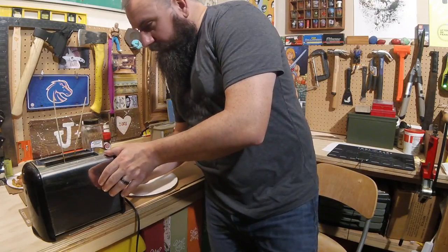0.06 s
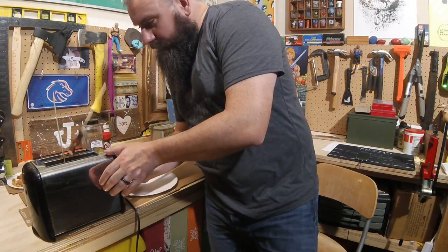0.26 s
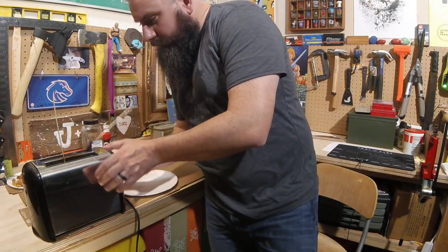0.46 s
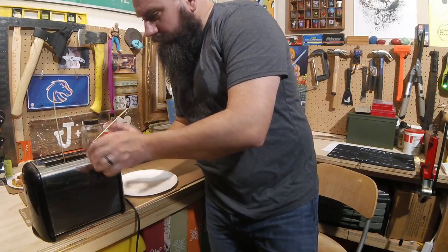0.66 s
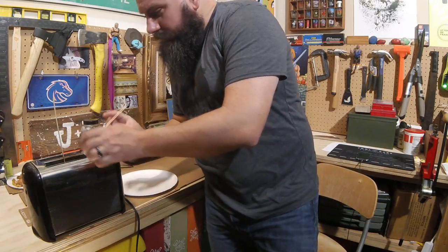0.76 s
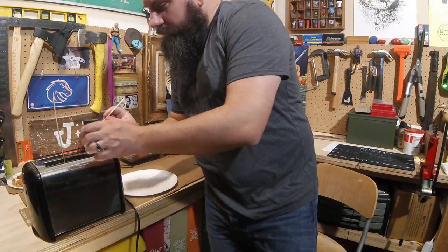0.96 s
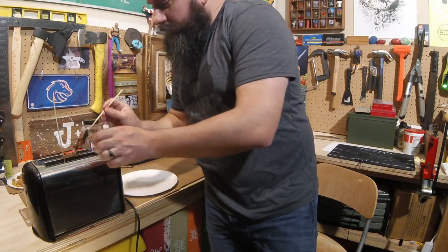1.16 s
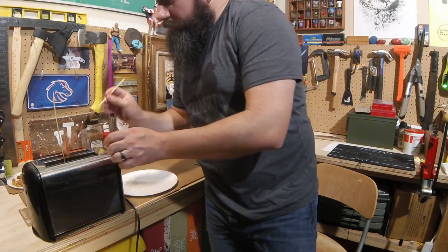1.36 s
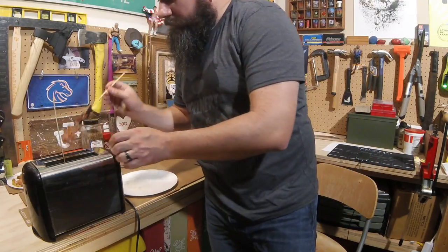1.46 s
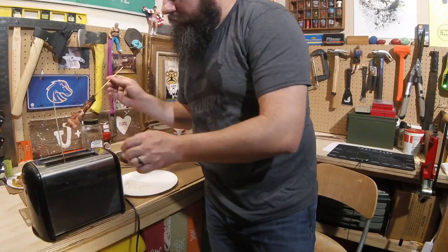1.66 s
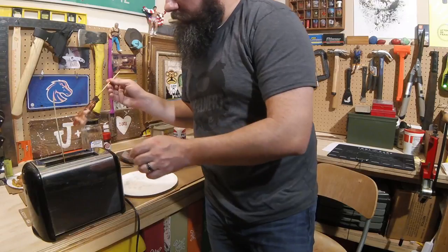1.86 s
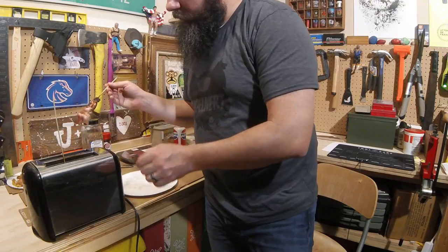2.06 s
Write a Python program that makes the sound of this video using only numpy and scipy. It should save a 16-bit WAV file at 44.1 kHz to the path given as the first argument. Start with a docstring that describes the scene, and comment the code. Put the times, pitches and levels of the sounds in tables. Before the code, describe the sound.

A toaster carriage pops up with a short scrape, a loud metallic clunk and brief rattle

```python
"""Pop-up toaster on a workshop bench

The carriage scrapes up its guide as dense tiny slips, slams into its stop and sets the steel shell ringing
(noise bursts and damped modes), then rebounds and rattles to rest. Later come a faint tink and one sharp,
bright click as a stick lifts something out of the slot. A small room answers with a decaying noise tail,
over a low wavering hum and hiss."""
import sys
import numpy as np
from scipy import signal
from scipy.fft import rfft, irfft, next_fast_len
from scipy.io import wavfile
from scipy.ndimage import map_coordinates

SR = 44100
rng = np.random.default_rng(int(sys.argv[2]) if len(sys.argv) > 2 else 0)


def unload_audio(sound):
    """Save the sound as a 16-bit wav file, at the path given as the first command line argument."""
    columns = np.transpose(np.atleast_2d(sound))
    # keep every value between -1 and 1, then stretch to whole-number steps
    steps = np.round(np.clip(columns, -1, 1) * 32767)
    wavfile.write(sys.argv[1], SR, steps.astype(np.int16))


N = 92610  # 2.1 s

# colour of light metal contacts, for the rack, the tinks and the clicks: f/Hz, relative level/dB
RATTLE_COLOUR = [(300, -14), (1500, -4.5), (2000, -8), (2900, 3), (3400, -5), (4200, 0), (4900, -10),
                 (6400, -23), (7500, -35), (13000, -54)]

CLICK_ATTACK_S, CLUNK_ATTACK_S, RATTLE_RISE_S = .0005, 0.00089, .002


def amp(db):
    """Decibels to gain."""
    return 10 ** (np.asarray(db) / 20)


def unit(x):
    """Scale to rms 1."""
    return x / np.sqrt(np.mean(x ** 2) + 1e-20)


def since(s):
    """Seconds since time s, zero before it."""
    return np.maximum(np.arange(N) / SR - s, 0)


def along(points, hz):
    """Read a curve of (Hz, value) points on a log frequency axis."""
    f, v = np.transpose(points)
    return np.interp(np.log(hz + 1), np.log(f + 1), v)


def wobble(rate):
    """A smooth random curve with this many knots a second."""
    return map_coordinates(rng.standard_normal(N // 20), [since(0) * rate])


def filtered(x, response):
    """Multiply the spectrum of x by a response of frequency."""
    m = next_fast_len(N + SR // 2)
    return irfft(rfft(x, m) * response(np.fft.rfftfreq(m, 1 / SR)), m)[:N]


def coloured(x, spectrum):
    """Pass x through a causal minimum-phase filter of unit power with this spectrum."""
    m = next_fast_len(N + SR // 2, True)
    gain = unit(amp(along(spectrum, np.fft.rfftfreq(m, 1 / SR))))
    # folding the cepstrum onto positive time puts the energy as early as it can be
    cepstrum = irfft(np.log(gain), m)
    cepstrum[1:m // 2] *= 2
    cepstrum[m // 2 + 1:] = 0
    return irfft(rfft(x, m) * np.exp(rfft(cepstrum)), m)[:N]


def noise(spectrum):
    """Steady noise, white at rms 1 before it is coloured."""
    return coloured(rng.standard_normal(N), spectrum)


def resonate(x, peaks):
    """Excite parallel band-pass resonances given as (Hz, width Hz, dB)."""
    def response(f):
        return sum(amp(db) * 1j * f * width / (centre ** 2 - f ** 2 + 1j * f * width)
                   for centre, width, db in peaks)
    return filtered(x, response)


def ring(s, modes, attack_s):
    """Damped modes (Hz, dB, t60 s) struck at time s, their levels a little different at every blow."""
    spread_db = 1 * rng.standard_normal(len(modes))
    t = since(s)
    live = (t > 0) & (t < .5)
    t = t[live]
    tone = np.zeros(len(t))
    for k, (hz, db, t60) in enumerate(modes):
        decay = amp(db + spread_db[k] - 60 * t / t60)
        tone += (-1) ** k * decay * np.sin(2 * np.pi * hz * t)  # alternate polarity
    out = np.zeros(N)
    out[live] = (1 - np.exp(-t / attack_s)) * tone
    return out


def bursts(rows, spectrum, rise_s=0.00031):
    """Coloured noise that flares and dies away at each (s, dB, t60 s); overlapping bursts add in power."""
    power = np.zeros(N)
    for s, db, t60 in rows:
        t = since(s)
        decay = amp(db - 60 * np.minimum(t / t60, 2))
        power += ((1 - np.exp(-t / rise_s)) * decay) ** 2
    return coloured(np.sqrt(power) * rng.standard_normal(N), spectrum)


def slide():
    """The catch snaps free and dense tiny slips scrape along the guide, exciting its resonances."""
    # swell of the scrape as the carriage rises: t/s, level/dB
    swell = [(.150, -76.5), (.163, -61), (.171, -44), (.182, -34), (.213, -39.5), (.228, -31.5),
             (.243, -34.5), (.255, -39.5), (.299, -38.5), (.302, -70)]
    # colour of the scrape: f/Hz, relative level/dB
    scrape_colour = [(70, -25), (125, -14), (175, -4), (222, -11.5), (300, 0.5), (480, 1), (900, -4),
                     (1200, -0.5), (2200, -2.5), (3300, -2), (5600, -2.5), (6550, -0.5), (7100, -18),
                     (8300, -21), (10200, -35.5), (11300, -23), (12400, -45.5), (14000, -60)]
    # resonances of guide and carriage: f/Hz, width/Hz, relative level/dB
    guide = [(177, 24, 5), (455, 20, 1), (586, 20, -0.5), (1150, 30, 3), (1560, 37, 3), (1649.6, 25, 1.5),
             (2630, 25, 0), (2912, 36, 2), (3397, 18, 4), (4457, 40, 0.5), (4700, 30, -0.5), (5248, 25, -2)]
    # modes of the catch: f/Hz, relative level/dB, t60/s
    catch = [(5200, -1.5, .025), (5480, -4, .02), (6400, -11, .03)]
    grains_per_s, grain_spread_db, guide_db = 5000, 2.5, 1.5
    catch_s, catch_db = .1703, -27.5

    level = amp(np.interp(since(0), *np.transpose(swell), left=-150, right=-150))
    hits = rng.random(N) < grains_per_s / SR
    polarity = np.sign(rng.standard_normal(N))
    slips = unit(hits * polarity * amp(grain_spread_db * rng.standard_normal(N)))
    scrape = coloured(level * slips, scrape_colour)
    snap = amp(catch_db) * ring(catch_s, catch, CLICK_ATTACK_S)
    return scrape + amp(guide_db) * resonate(scrape, guide) + snap


def stop():
    """The carriage chatters against its stop, the body clunks and the shell and its panels ring."""
    # contacts at the stop: t/s, level/dB
    chatter = [(.3000, -22), (.3010, -17), (0.3043, -20), (.3066, -19.5), (.3100, -18.5)]
    # colour of each crack: f/Hz, relative level/dB
    crack_colour = [(120, -28), (220, -22), (310, 1.5), (600, 2), (740, -5), (900, 7.5), (1400, 0.5),
                    (2000, -0.5), (2600, -7), (3700, -9), (4500, 2), (5000, -12.5), (6500, -8), (7300, -22),
                    (10000, -36), (11500, -29.5), (12500, -56.5)]
    # the body's short clunk on the bench: f/Hz, level before radiation/dB, t60/s
    clunk = [(316, -13, .06), (373.4, -22, .05), (464.5, -12.5, .06), (584.1, -20, 0.086),
             (890, -12.5, 0.053), (985, -22, 0.051), (1160, -26, .07), (1594.5, -24, 0.071),
             (1861.5, -23, .06), (2973, -27, 0.04), (3418.8, -28, .05), (4520, -24, .06)]
    # the small body radiates little bass: f/Hz, relative level/dB
    radiation = [(60, -16), (210, -10), (300, 0)]
    # ringing of the steel shell: f/Hz, level/dB, t60/s
    shell = [(174, -44, 0.46), (306, -38.5, .25), (457, -34.5, 0.24), (517, -36.5, 0.22), (659, -36, .23),
             (701, -38.5, .26), (892, -30, 0.32), (975, -31.5, 0.17), (1043.6, -36, .22),
             (1168, -33.5, .24), (1222, -34, 0.25), (1293, -37.5, .34), (1605, -40, .3), (1865, -40.5, .22),
             (4520, -37, .2), (6358, -40.5, 0.11), (7750, -46.5, .08), (13280, -50, .06)]
    # dense ring of the thin panels: f/Hz, relative level/dB
    panel_colour = [(120, -31), (230, -15.5), (300, -4), (460, 1.5), (620, -7), (780, -8), (920, -0.5),
                    (1250, -4.5), (1600, -10), (3000, -12.5), (4500, -14), (5300, -20), (6400, -17),
                    (7200, -32), (10000, -45.5), (11500, -42), (13000, -62)]
    stop_s, shell_attack_s, crack_t60_s = .3002, 0.0052, .028
    panel_db, panel_t60_s = -27, 0.35

    cracks = bursts([(s, db, crack_t60_s) for s, db in chatter], crack_colour)
    body = coloured(ring(stop_s, clunk, CLUNK_ATTACK_S), radiation)
    shell_ring = ring(stop_s, shell, shell_attack_s)
    panels = bursts([(stop_s, panel_db, panel_t60_s)], panel_colour)
    return cracks + body + shell_ring + panels


def rebounds():
    """Each rebound of the carriage is a soft thud that stirs one resonance of the shell."""
    # rebounds: t/s, level of the tone/dB, f/Hz, t60 of the tone/s
    bounces = [(.3305, -26, 919, 0.032), (.3410, -28, 980, 0.062), (0.3459, -23, 457.8, 0.18),
               (0.3713, -28, 457, 0.031)]
    # colour of the thud: f/Hz, relative level/dB
    thud_colour = [(120, -20), (300, 1), (470, -3), (700, -7), (950, -1), (1500, -4), (4500, -11.5),
                   (6500, -19.5), (9000, -45), (13000, -60)]
    thud_db, thud_t60_s = -9.5, 0.032  # thud level is relative to the tone

    tones = sum(ring(s, [(hz, db, t60)], CLUNK_ATTACK_S) for s, db, hz, t60 in bounces)
    thuds = bursts([(s, db + thud_db, thud_t60_s) for s, db, hz, t60 in bounces], thud_colour)
    return tones + thuds


def rack():
    """The wire rack settles in ever weaker rattles, each a noise burst that rings its wires."""
    # rattles: t/s, level/dB, t60 of the noise/s
    rattles = [(0.4372, -40.5, 0.121), (.528, -57, 0.0797), (0.538, -59, 0.0582), (.632, -65, 0.085)]
    # modes of the rack: f/Hz, relative level/dB, t60/s
    wires = [(1569.4, -13.5, 0.19), (2870, -10, .16), (2964, -11.5, 0.14), (3875, -11.5, 0.2),
             (3940, -11, .17), (4180, -13, 0.088), (4620, -19, 0.12), (5250, -19, 0.25)]

    rustle = bursts(rattles, RATTLE_COLOUR, RATTLE_RISE_S)
    return rustle + sum(amp(db) * ring(s, wires, RATTLE_RISE_S) for s, db, t60 in rattles)


def tinks():
    """Light touches, each a soft noise burst, ring a wire in the slot."""
    # touches in the slot: t/s, level/dB
    touches = [(1.148, -77), (1.172, -79), (1.211, -63.5), (1.222, -70.5)]
    # modes of the wire: f/Hz, relative level/dB, t60/s
    wire = [(2771, -3, .13), (4120, 1, 0.131), (4180, -9, 0.094), (5240, -6, .08)]
    touch_db, touch_t60_s = 2, .06  # noise level is relative to the touch

    brush = bursts([(s, db + touch_db, touch_t60_s) for s, db in touches], RATTLE_COLOUR, RATTLE_RISE_S)
    return brush + sum(amp(db) * ring(s, wire, CLICK_ATTACK_S) for s, db in touches)


def clicks():
    """A small hard contact is a snap of noise and close, beating high modes."""
    # the bright click and its small neighbours: t/s, level/dB
    contacts = [(1.8063, -52), (1.8105, -36.5), (1.8788, -60)]
    # modes of the click: f/Hz, relative level/dB, t60/s
    modes = [(5443, -16.5, 0.02), (5656, -18, .02), (6007, 0, .021), (6295, 0, 0.0224), (6060, -28, 0.14)]
    snap_db, snap_t60_s = -13.5, 0.0061  # snap level is relative to the contact

    snaps = bursts([(s, db + snap_db, snap_t60_s) for s, db in contacts], RATTLE_COLOUR)
    return snaps + sum(amp(db) * ring(s, modes, CLICK_ATTACK_S) for s, db in contacts)


def room(x):
    """The workshop answers with a diffuse noise tail whose decay time depends on frequency."""
    # reverberation time: f/Hz, t60/s
    room_t60 = [(150, 0.45), (1000, 0.26), (4000, 0.33), (7000, 0.11), (12000, .18)]
    delay_s = .005

    hz, t, z = signal.stft(rng.standard_normal(SR // 2), SR, nperseg=256)
    decay = amp(-60 * t / along(room_t60, hz)[:, None])
    tail = signal.istft(z * decay, SR, nperseg=256)[1]
    tail = np.pad(tail / np.linalg.norm(tail), (int(delay_s * SR), 0))
    return signal.fftconvolve(x, tail)[:N]


def background():
    """Room air and the microphone's hiss are coloured noise; the low drone is sines that waver in pitch."""
    # colour of the room air: f/Hz, relative level/dB
    air_colour = [(15, -17.5), (25, -7), (45, -8), (95, -11), (150, -17), (290, -21), (480, -24),
                  (1000, -29), (2000, -32.5), (3200, -36), (4500, -43), (6500, -61)]
    # colour of the hiss: f/Hz, relative level/dB
    hiss_colour = [(3000, -30), (4800, -16), (5900, -11), (6450, 0), (7200, -6), (9000, -10.5),
                   (10400, -18), (12000, -14), (13500, -19.5), (14300, -28)]
    # partials of the drone: mean f/Hz, relative level/dB
    partials = [(71, -0.5), (121, -12.5), (177, -19)]
    air_db, hiss_db, hum_db = -65.5, -73, -62
    wander_hz, knots_per_s = 3.5, 10

    hum = np.zeros(N)
    for hz, db in partials:
        pitch = hz + wander_hz * wobble(knots_per_s)
        hum += amp(db) * np.sin(2 * np.pi * np.cumsum(pitch) / SR)
    return amp(air_db) * noise(air_colour) + amp(hiss_db) * noise(hiss_colour) + amp(hum_db) * hum


def scene():
    """The toaster and the small contacts, each with its share of room, over the background."""
    room_db, small_room_db = -11.5, -7.5
    toaster = slide() + stop() + rebounds() + rack()
    small = tinks() + clicks()
    answer = amp(room_db) * room(toaster) + amp(small_room_db) * room(small)
    return (toaster + small + answer + background())[None]


def record(dry):
    """Nothing is kept above the band limit."""
    top_hz = 14300
    return filtered(dry[0], lambda hz: hz < top_hz)[None]


dry = scene()
out = record(dry)
unload_audio(out)
```